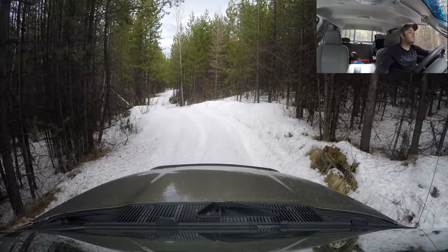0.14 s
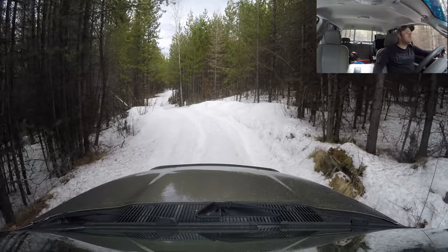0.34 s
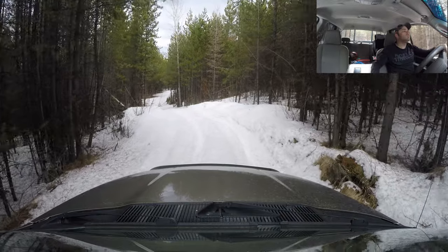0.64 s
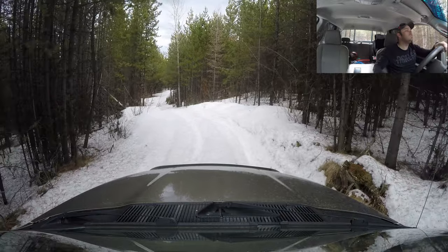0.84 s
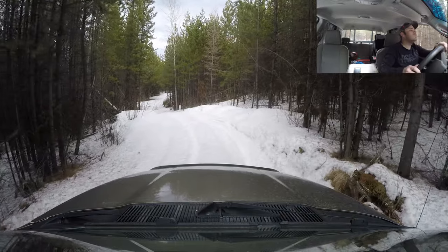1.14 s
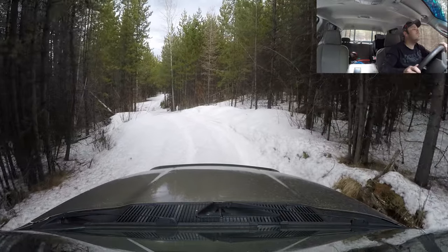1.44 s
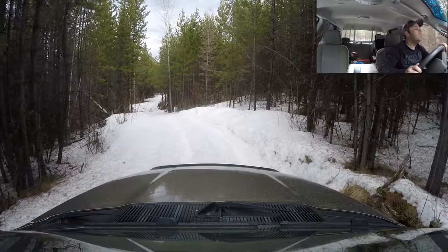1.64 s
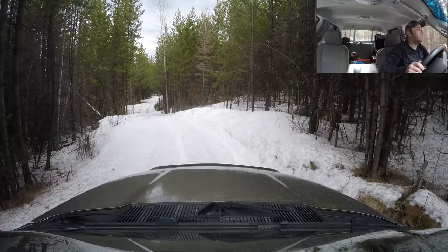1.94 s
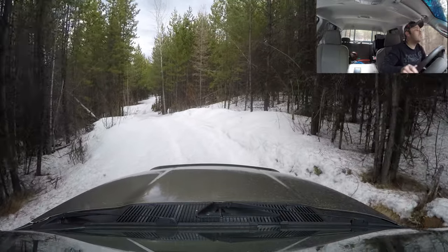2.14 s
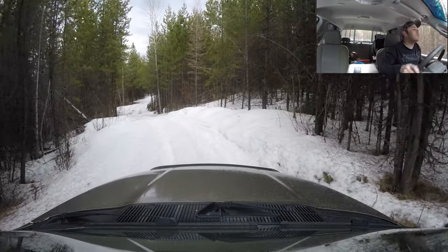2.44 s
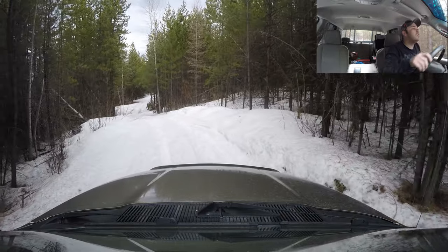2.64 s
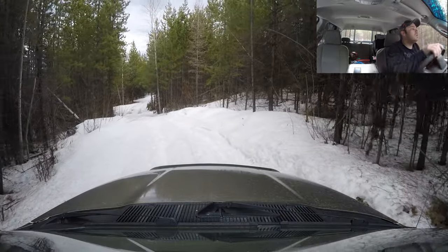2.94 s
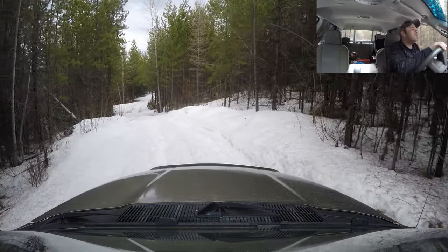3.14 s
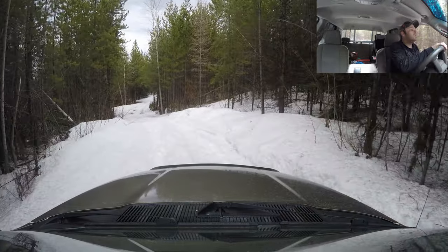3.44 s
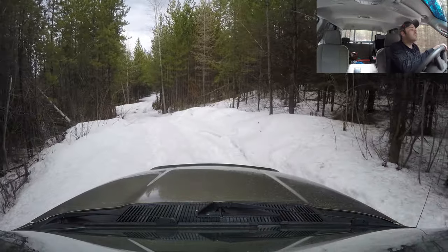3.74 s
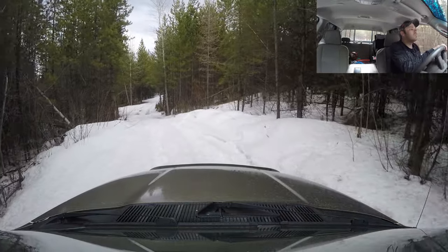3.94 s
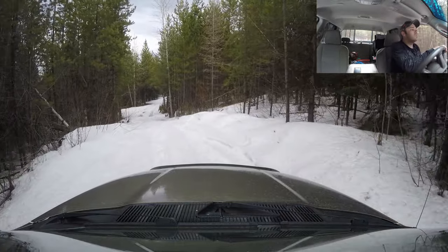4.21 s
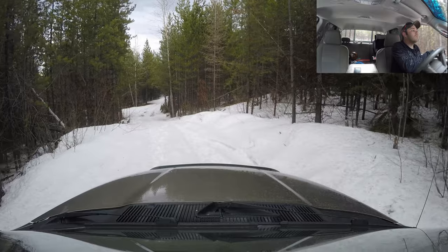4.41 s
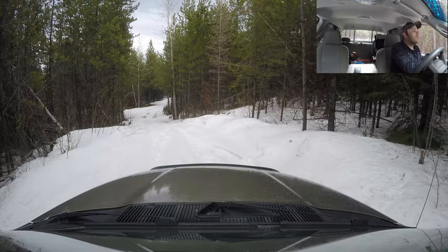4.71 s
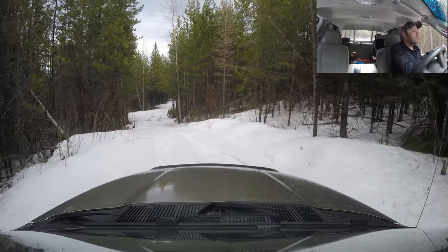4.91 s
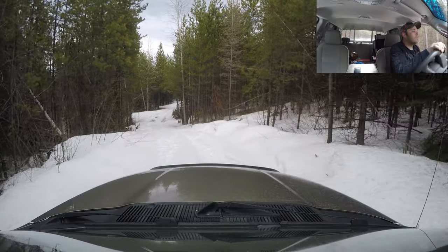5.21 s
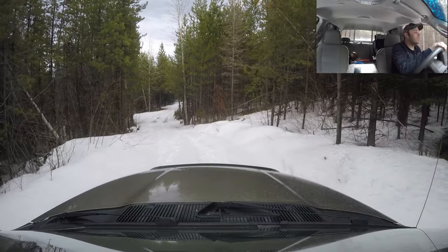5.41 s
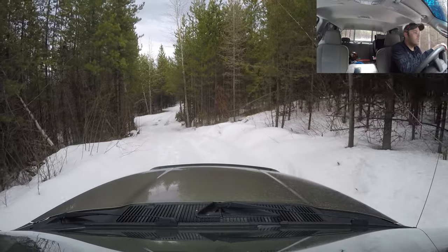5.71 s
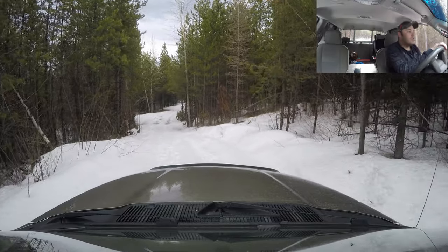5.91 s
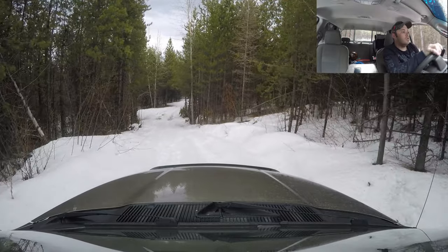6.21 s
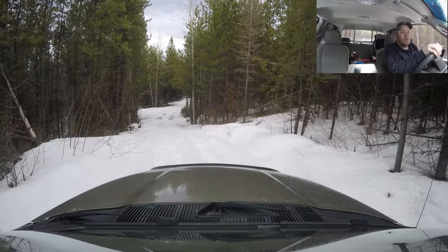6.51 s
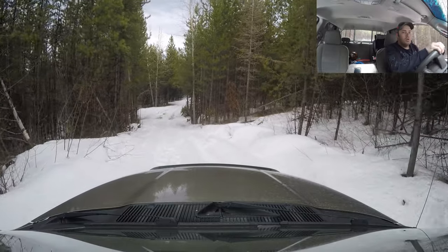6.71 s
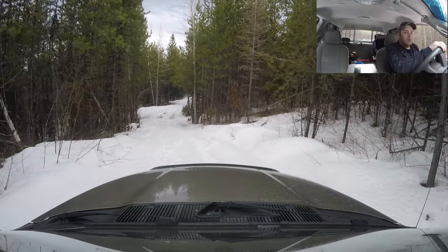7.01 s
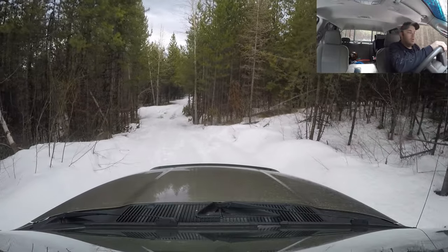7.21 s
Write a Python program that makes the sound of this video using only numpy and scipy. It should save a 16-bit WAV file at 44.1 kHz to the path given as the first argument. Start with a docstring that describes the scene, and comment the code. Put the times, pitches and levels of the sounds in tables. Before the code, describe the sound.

A deep engine hum and drivetrain drone fill the cab of a truck moving slowly over packed snow, with the microphone inside. Low booms and shudders come and go above the muffled tyre roar and soft crunch. One bump thuds through the floor near the start, and loose trim ticks and knocks now and then. A faint gear whine swells at times, and the engine gradually sinks in pitch.

```python
"""A V8 truck engine hums through the air resonances of the closed cab on a slow, snowy forest trail.
The driveline drones and whines at its own speed, and a panel sings along. Axle hop shakes the body
and booms in the cab over the ruts; the chassis rumbles, tyres roar and crunch the snow, and the
floor pan thuds once. Trim ticks, knocks and squeaks, and a hand slides on the wheel over a faint hiss."""
import sys
import numpy as np
from scipy import signal
from scipy.fft import rfft, irfft
from scipy.io import wavfile

SR = 44100
rng = np.random.default_rng(int(sys.argv[2]) if len(sys.argv) > 2 else 0)


def persist_wave(psi):
    """Save psi, clipped to +-1, as 16-bit WAV."""
    counts = np.round(np.clip(psi, -1, 1) * 32767).astype(np.int16)
    wavfile.write(sys.argv[1], SR, np.atleast_2d(counts).T)


N = 324576
T = np.arange(N) / SR
HZ = np.fft.rfftfreq(N, 1 / SR)


def amp(db):
    """Decibels to gain."""
    return 10 ** (np.asarray(db) / 20)


def unit(x):
    """Scales to rms 1."""
    return x / np.sqrt(np.mean(x ** 2) + 1e-20)


def curves(rows):
    """The columns of a time table, at every sample."""
    times_s, *columns = np.transpose(rows)
    return [np.interp(T, times_s, column) for column in columns]


def colour(points):
    """Spectrum points to dB at every frequency."""
    hz, db = np.transpose(points)
    return np.interp(np.log(HZ + 1), np.log(hz), db)


def lift_db(resonances, hz):
    """Summed lift of a set of resonances at hz."""
    return sum(db / (1 + (2 * (hz - centre_hz) / width_hz) ** 2) for centre_hz, width_hz, db in resonances)


def shaped(x, db):
    """Filters x by a dB spectrum; rms 1."""
    return unit(irfft(rfft(x) * amp(db), N))


def white(samples=N):
    """White noise."""
    return rng.standard_normal(samples)


def drift(rate_hz):
    """Random motion, rolled off above rate_hz; rms 1."""
    return unit(irfft(rfft(white()) * np.exp(-(HZ / rate_hz) ** 2), N))


def wandering(hz, wander_hz, rate_hz):
    """Cycles made by a vibration whose pitch wanders about hz."""
    return np.cumsum(hz + wander_hz * drift(rate_hz)) / SR + rng.random()


def rotation(rows):
    """Speed of a shaft in Hz and the turns it has made."""
    speed_hz, = curves(rows)
    return speed_hz, np.cumsum(speed_hz) / SR


def ring(x, hz, width_hz):
    """A steep resonance that can follow a moving pitch; rms 1."""
    carrier = np.exp(2j * np.pi * np.cumsum(hz * np.ones(len(x))) / SR)
    pole = np.exp(-np.pi * width_hz / SR)
    baseband = signal.lfilter([1], [1, -2 * pole, pole * pole], x / carrier)
    return unit((carrier * baseband).real)


def swells(rows, attack_s, release_s):
    """Gain of events that rise, hold to the end of their length and die away."""
    power = np.zeros(N)
    for start_s, length_s, db in rows:
        rise = np.clip((T - start_s) / attack_s, 0, 1)
        fall = np.exp(-np.maximum(T - start_s - length_s, 0) / release_s)
        power += (amp(db) * rise * fall) ** 2
    return np.sqrt(power)


def strike(age_s, rise_s, t60_s):
    """Gain of a blow: quick rise, exponential decay."""
    age_s = np.clip(age_s, 0, 1)
    return np.exp(-np.log(1000) * age_s / t60_s) * (1 - np.exp(-age_s / rise_s))


# Cab hiss. Each row: frequency in Hz, relative level in dB.
HISS_SPECTRUM = [(1500, -1), (5000, 2.5), (7000, -2), (9500, -5), (12000, -5.5), (14000, -12),
                 (15000, -13.5), (15700, -25.5)]

def hiss(level_db=-65):
    """A steady hiss behind everything."""
    return amp(level_db) * shaped(white(), colour(HISS_SPECTRUM))


# Hand strokes. Each row: start in seconds, length in seconds, level in dB.
HAND_STROKES = [(2.015, 0.18, -62), (2.24, 0.18, -66.5)]
# Hand friction. Each row: frequency in Hz, relative level in dB.
HAND_SPECTRUM = [(1500, -21), (4000, 1), (7000, -2), (12000, -5), (14500, -4.5), (15700, -22)]

def hand_on_wheel(scratch_db=2.8):
    """A hand slides along the steering wheel with a soft, scratchy hiss."""
    strokes = swells(HAND_STROKES, attack_s=0.068, release_s=0.06)
    return shaped(white(), colour(HAND_SPECTRUM)) * strokes * amp(scratch_db * drift(120))


# Squeaks. Each row: start in seconds, length in seconds, level in dB, pitch in Hz, glide in Hz/s.
TRIM_SQUEAKS = [(5.042, 0.077, -65, 2900, 4), (5.091, 0.11, -60.5, 2900, 1400), (5.192, .16, -68, 2380, 1),
                (5.262, 0.019, -59, 2580, 28000)]

def trim_squeaks(rattle_db=4):
    """Plastic rubs as the body twists: a narrow gliding note over a lower rattle."""
    rub = white()
    rattle = amp(rattle_db) * ring(white(), hz=2200, width_hz=900)
    out = np.zeros(N)
    for start_s, length_s, db, hz, glide_hz_per_s in TRIM_SQUEAKS:
        pitch_hz = hz + glide_hz_per_s * np.clip(T - start_s, 0, 2 * length_s)
        note = ring(rub, pitch_hz, width_hz=140)
        out += swells([(start_s, length_s, db)], attack_s=0.034, release_s=0.012) * (note + rattle)
    return out


def tick(hz, width_hz, t60_s, snap_db):
    """One piece of trim snaps at contact, then chatters briefly in the same resonance."""
    age_s = T[:SR // 10]
    snap = ring(white(len(age_s)), hz, width_hz) * strike(age_s, rise_s=0.00015, t60_s=0.0063)
    chatter = ring(white(len(age_s)), hz, width_hz) * strike(age_s, rise_s=0.00066, t60_s=t60_s)
    return amp(snap_db) * snap + chatter


# Cab resonances, for knocks and tyres. Each row: centre in Hz, width in Hz, lift in dB.
CAB_MODES = [(170.2, 16.5, 12.5), (278.2, 4.9, 3), (364.8, 30, 10.5), (529, 19, 6.5), (577.5, 56, 5.5),
             (777, 32, 8), (1300, 46, 4.5), (1430, 26, 6.5), (1770, 90, 1)]
# Panel knocks. Each row: start in seconds, level in dB.
PANEL_KNOCKS = [(0.498, -42), (.646, -28), (0.661, -25), (2.456, -30), (3.175, -39), (6.332, -32),
                (6.366, -28)]
# Knocked panel. Each row: frequency in Hz, relative level in dB.
KNOCK_SPECTRUM = [(150, -19), (500, 28.5), (900, 5), (1400, 13), (2200, -20), (5000, -25), (12000, -47)]
# Ticks. Each row: start in seconds, level in dB, ring in Hz, width in Hz, T60 in seconds,
# snap relative to chatter in dB.
TRIM_TICKS = [(.296, -42.5, 1700, 450, .07, -10), (.298, -47, 4200, 1100, 0.048, -0.5),
              (.630, -50, 8700, 1500, .04, -6), (.630, -44, 2800, 1300, .045, -6),
              (.645, -44.5, 4460, 800, .07, -5), (.646, -35.5, 1420, 700, 0.11, -6),
              (.647, -49, 2900, 1000, .08, -7), (.652, -46.5, 4450, 600, .06, -5),
              (.658, -47, 4300, 450, .045, -5), (0.665, -47, 2900, 1300, 0.065, -1),
              (.664, -56, 6030, 700, 0.024, -5), (.698, -56, 6000, 1500, .03, -3),
              (.72, -49, 2500, 1500, .04, -2), (.989, -48, 3000, 1500, .03, 0),
              (1.208, -57, 7500, 1500, 0.035, -5), (1.289, -46, 1640, 400, 0.062, -5),
              (2.117, -56, 5500, 5000, 0.023, 2), (2.22, -55, 6200, 3000, .025, 2),
              (2.375, -49, 6440, 7000, .03, 2), (2.552, -47, 4100, 1500, 0.032, -10),
              (2.892, -55, 6500, 5000, .025, 0), (4.02, -56, 6000, 6000, .015, 2),
              (4.419, -54, 6260, 2400, .04, -4), (4.455, -54, 5200, 1300, .045, -8),
              (5.11, -51, 5470, 5000, .03, 0), (5.141, -50.5, 6000, 4000, .03, 0),
              (6.091, -45, 5200, 800, .02, 2), (6.101, -52, 5200, 1200, .02, 2),
              (6.128, -47, 2800, 2200, 0.034, -2), (6.157, -52, 4500, 2500, .03, 0),
              (6.330, -44, 3100, 900, 0.023, 4), (6.332, -45, 2250, 600, .035, -2),
              (6.360, -50, 3080, 900, .025, 0), (6.366, -49, 1990, 1200, .025, -2),
              (6.447, -54, 5500, 5000, .055, -5), (6.589, -47, 6400, 3500, 0.023, -1),
              (6.594, -45, 4200, 2400, .03, -2), (6.628, -54, 4300, 1400, .03, -3)]

def loose_trim(cutoff_hz=9000):
    """Loose trim ticks and a panel knocks; upholstery dulls the treble."""
    panel = shaped(white(), colour(KNOCK_SPECTRUM) + lift_db(CAB_MODES, HZ))
    blows = sum(amp(db) * strike(T - start_s, rise_s=0.0013, t60_s=0.027) for start_s, db in PANEL_KNOCKS)
    out = panel * blows
    for start_s, db, hz, width_hz, t60_s, snap_db in TRIM_TICKS:
        sound = amp(db) * tick(hz, width_hz, t60_s, snap_db)
        span = out[round(start_s * SR):][:len(sound)]
        span += sound[:len(span)]
    return irfft(rfft(out) / np.hypot(1, (HZ / cutoff_hz) ** 4), N)


# Hardest bump. One row: start in seconds, level in dB, T60 in seconds.
FLOOR_HIT = (.655, -29, 0.24)
# Floor pan. Each row: frequency in Hz, relative level in dB.
FLOOR_SPECTRUM = [(120, -26), (220, 5), (300, 6), (420, -9), (700, -14), (1500, -52)]

def floor_thud():
    """The hardest bump sets the floor pan ringing in the low mids."""
    start_s, db, t60_s = FLOOR_HIT
    blow = amp(db) * strike(T - start_s, rise_s=0.0034, t60_s=t60_s)
    return blow * shaped(white(), colour(FLOOR_SPECTRUM))


# Tyres on snow. Each row: time in seconds, roar before boost in dB, crunch in dB.
TYRE_LEVELS = [(0, -42.5, -55.5), (.7, -42.5, -55.5), (1.3, -45, -59.5), (1.9, -45, -56.5), (3.3, -44, -58),
               (5, -45, -58.5), (5.75, -46, -60), (6.45, -46.5, -56.5), (7, -46.5, -60)]
# Rolling roar and snow crunch. Each row: frequency in Hz, relative level in dB.
ROAR_SPECTRUM = [(30, -7.5), (65, -2), (110, -5), (150, -5.5), (205, -5.5), (250, -10), (320, -17.5),
                 (450, -19.5), (690, -26.5), (1000, -27), (1200, -33.5), (1900, -40.5), (3000, -50.5),
                 (8000, -76)]
CRUNCH_SPECTRUM = [(700, -14), (1500, -2), (2100, 0.5), (2600, 0), (3400, -6.5), (4600, -8), (5200, -12),
                   (7000, -15.5), (9500, -21.5), (15000, -30.5)]

def tyres(crank_turns, roar_boost_db=15, grains_per_s=250, grains_db=-14, spread_db=4, lumps_db=0.93):
    """Rolling roar, throbbing at the firing rate, and the fine crunch of packed snow."""
    roar_db, crunch_db = curves(TYRE_LEVELS)
    cab_db = lift_db(CAB_MODES, HZ)
    throb = 1 + 0.095 * np.cos(2 * np.pi * 4 * crank_turns)  # four firings a turn
    roar = shaped(white(), colour(ROAR_SPECTRUM) + cab_db) * amp(roar_db + roar_boost_db)
    onsets = rng.random(N) < grains_per_s / SR
    sizes = amp(spread_db * np.minimum(rng.exponential(1, N), 4))
    snow = white() + amp(grains_db) * unit(onsets * sizes * np.sign(white()))
    crunch = shaped(snow, colour(CRUNCH_SPECTRUM) + cab_db)
    return throb * roar + crunch * amp(crunch_db + lumps_db * drift(23))


# Chassis rumble around the two body modes. Each row: frequency in Hz, relative level in dB.
RUMBLE_SPECTRUM = [(8, -31), (15, -10.5), (20, 1), (25, 3), (31, -12), (38, -3), (45, 1), (53, -6),
                   (61, -20.5), (100, -47), (300, -110)]

def chassis_rumble(level_db=-23):
    """The chassis rumbles loosely over uneven snow."""
    return amp(level_db) * shaped(white(), colour(RUMBLE_SPECTRUM))


def body_mode(jolts, cycles, rest_db, attack_s, wobble, slack_rad):
    """A low resonance, always stirred a little and swung hard by each jolt."""
    swing = np.hypot(amp(rest_db), swells(jolts, attack_s, release_s=0.028))
    swing *= 1 + wobble * drift(16)
    return np.sqrt(2) * swing * np.cos(2 * np.pi * cycles + slack_rad * drift(7.2))


# Jolts from ruts and bumps. Each row: start in seconds, length in seconds, level in dB.
BODY_SHUDDERS = [(.47, 0.4, -14.5), (1.08, 0.26, -16), (1.5, 0.39, -14), (2.55, 0.15, -12.5),
                 (2.93, 0.16, -16), (3.56, 0.33, -14), (4.24, 0.14, -13.5), (5.02, 0.1, -13.5),
                 (5.97, 0.62, -16), (6.78, 0.18, -15.5), (7.1, 0.17, -14)]
CAB_BOOMS = [(.04, 0.21, -22), (.49, 0.082, -16.5), (.64, 0.13, -11), (.92, 0.034, -10.5),
             (1.53, 0.072, -15), (2.11, 0.059, -13), (2.58, 0.079, -16), (3.14, 0.11, -14),
             (3.32, 0.25, -14.5), (3.95, 0.14, -16), (4.62, 0.2, -20), (4.87, 0.19, -13),
             (5.27, 0.47, -14.5), (5.81, 0.053, -11), (6.26, 0.055, -10), (6.41, 0.32, -17.5),
             (6.73, 0.25, -17.5)]

def body():
    """The axle hops on its springs: the body shudders at that rate and the cab booms at twice it."""
    hop = wandering(hz=19.9, wander_hz=0.697, rate_hz=3.14)
    shudder = body_mode(BODY_SHUDDERS, hop, rest_db=-22, attack_s=0.043, wobble=0.21, slack_rad=0.3)
    boom = body_mode(CAB_BOOMS, 2 * hop, rest_db=-25, attack_s=0.026, wobble=0.18, slack_rad=0.56)
    return shudder + boom


# Panel note. Each row: start in seconds, length in seconds, level in dB.
PANEL_SWELLS = [(1.0, 0.39, -52.5), (5.9, 0.26, -51), (6.2, 0.27, -48.5), (6.95, 0.19, -50.5)]

def singing_panel(flutter=0.37):
    """A panel sings in sympathy with the driveline: a thin, nearly steady note that comes and goes."""
    level = swells(PANEL_SWELLS, attack_s=0.097, release_s=0.099) * (1 + flutter * drift(15))
    return np.sqrt(2) * level * np.sin(2 * np.pi * wandering(hz=508, wander_hz=2.2, rate_hz=7.4))


# Gear whine. Each row: start in seconds, length in seconds, level in dB.
WHINE_SWELLS = [(.79, 0.15, -57), (1.72, 0.16, -54.5), (1.95, 0.17, -62), (4.84, 0.13, -58),
                (5.03, 0.27, -55.5), (5.61, 0.18, -52.5), (5.78, 0.32, -59.5), (6.2, .6, -68),
                (6.9, .6, -58.5)]

def gear_whine(shaft_turns, teeth=54, rest_db=-71, lash_rad=0.55, flutter=0.2, rasp=0.28):
    """The gear mesh sings faintly and swells at times; backlash and rubbing teeth roughen it."""
    level = np.hypot(amp(rest_db), swells(WHINE_SWELLS, attack_s=0.12, release_s=0.044))
    level *= 1 + flutter * drift(30) + rasp * drift(110)
    return np.sqrt(2) * level * np.sin(2 * np.pi * teeth * shaft_turns + lash_rad * drift(25))


# Drive shaft speed. Each row: time in seconds, turns per second.
SHAFT_SPEED = [(0, 26.5), (.3, 26.5), (.75, 23.3), (1.1, 24.4), (1.4, 24.32), (1.8, 26.8), (2.1, 27.03),
               (2.4, 28.33), (2.6, 30.1), (3.15, 32.05), (4.5, 31.7), (4.75, 29.88), (5.25, 27.6),
               (5.55, 27.2), (6.1, 24.55), (6.85, 25.35), (7.36, 23.85)]
# Shaft orders. Each row: multiple of shaft speed, base level in dB.
SHAFT_PARTIALS = [(3, -44), (4, -47.5), (7, -54), (8, -54), (9, -58), (11.5, -66), (12, -59), (12.5, -64),
                  (13, -59.5), (14, -64.5)]
# Pull on the driveline. Each row: time in seconds, low-order drone gain in dB, high-order moan gain in dB.
TORQUE_GAINS = [(.25, 6, -17), (.6, -0.5, -12), (.9, -4, 10), (1.15, -0.5, 3.5), (1.45, 2, 1.5),
                (2.1, -5, 5), (2.6, -5.5, 7.5), (2.95, 2.5, -3), (3.4, 1, 6.5), (3.8, -0.5, -3.5),
                (4.5, 1.5, 1.5), (5, -4.5, 1), (5.3, 0.5, 5), (5.8, 5, 4.5), (6.1, -4.5, -7.5),
                (6.95, 1, -1), (7.36, -5.5, -3)]
# Frame resonances. Each row: centre in Hz, width in Hz, lift in dB.
FRAME_MODES = [(96.8, 22.5, 14), (166.2, 15, 20), (282, 18, 11), (362.7, 45, 16)]

def driveline(speed_hz, turns, drone_flutter=0.052, moan_flutter=0.26, play_rad=0.028):
    """Shaft orders swell as they sweep through the frame's resonances."""
    drone_db, moan_db = curves(TORQUE_GAINS)
    out = np.zeros(N)
    for order, db in SHAFT_PARTIALS:
        pull_db, flutter = (moan_db, moan_flutter) if order > 10 else (drone_db, drone_flutter)
        level = amp(db + pull_db + lift_db(FRAME_MODES, order * speed_hz)) * (1 + flutter * drift(28))
        smear_rad = play_rad * order * drift(23)  # joint play smears the higher orders
        out += level * np.sin(2 * np.pi * (order * turns + rng.random()) + smear_rad)
    return np.sqrt(2) * out


# Crankshaft speed, sagging under load. Each row: time in seconds, turns per second.
CRANK_SPEED = [(0, 26.3), (.4, 26.5), (.8, 25.9), (1.3, 24.23), (1.7, 23.85), (2.1, 24.05), (3.5, 24.0),
               (4.8, 23.52), (5.2, 22.95), (6, 22.43), (7, 21.4), (7.36, 21.4)]
# Crankshaft orders. Each row: multiple of crankshaft speed, base level in dB.
CRANK_PARTIALS = [(2, -30), (3, -35), (4, -46.5), (5, -43.5), (6, -47.5), (7, -39.5), (8, -45.5), (9, -56),
                  (10, -55.5), (11, -54.5), (12, -55), (15, -54.5), (16, -54), (24, -59), (32.5, -72)]
# Engine load. Each row: time in seconds, gain at the main air resonance in dB.
LOAD_GAIN = [(0, 11), (1.1, 4.5), (1.3, 3), (1.7, 4), (2, -0.5), (2.25, 3), (2.65, 0.5), (3, 2), (3.4, 3.5),
             (4.2, 0.5), (4.7, -2), (5.6, -9.5), (7.36, 1)]
# Cab air resonances, main one first. Each row: centre in Hz, width in Hz, lift in dB.
CAB_AIR_MODES = [(167.64, 17, 12.5), (205.3, 12, 6)]

def engine(speed_hz, turns, unevenness=0.19, steadying=0.7):
    """Orders flutter with uneven firing; in a cab resonance they bloom into a hum that follows the load."""
    load_db, = curves(LOAD_GAIN)
    peak_db = CAB_AIR_MODES[0][2]
    out = np.zeros(N)
    for order, db in CRANK_PARTIALS:
        bloom_db = lift_db(CAB_AIR_MODES, order * speed_hz)
        in_tune = bloom_db / peak_db
        flutter = 1 + unevenness * (1 - steadying * in_tune) * drift(6)
        level = amp(db + bloom_db + in_tune * load_db) * flutter
        out += level * np.sin(2 * np.pi * (order * turns + rng.random()))
    return np.sqrt(2) * out


def scene():
    """All sources as heard in the cab, in mono."""
    crank_hz, crank_turns = rotation(CRANK_SPEED)
    shaft_hz, shaft_turns = rotation(SHAFT_SPEED)
    mix = engine(crank_hz, crank_turns)
    mix += driveline(shaft_hz, shaft_turns) + gear_whine(shaft_turns) + singing_panel()
    mix += body() + chassis_rumble() + tyres(crank_turns)
    mix += hiss() + loose_trim() + floor_thud() + trim_squeaks() + hand_on_wheel()
    return mix[None]


def record(dry):
    """Eases the ends and cuts the top treble."""
    eased = dry * signal.windows.tukey(N, 0.002)
    lowpass = signal.firwin(511, cutoff=15600, window=("kaiser", 9), fs=SR)
    return signal.oaconvolve(eased, lowpass[None], "same")


dry = scene()
out = record(dry)
persist_wave(out)
```